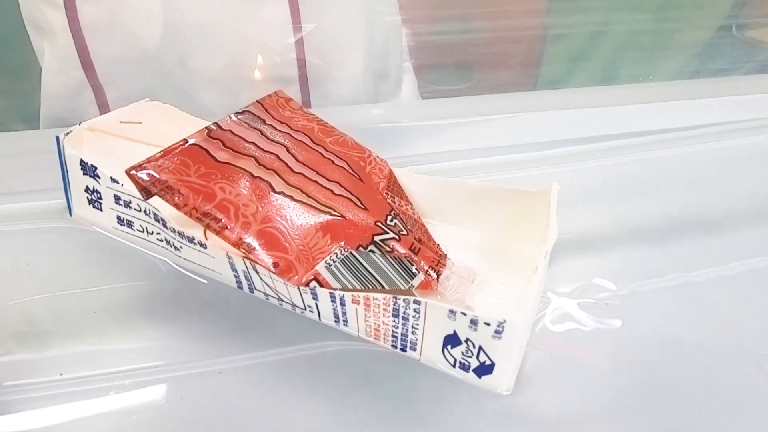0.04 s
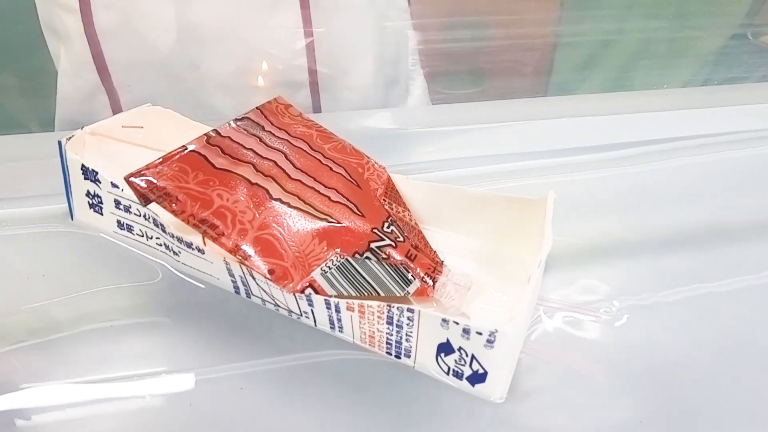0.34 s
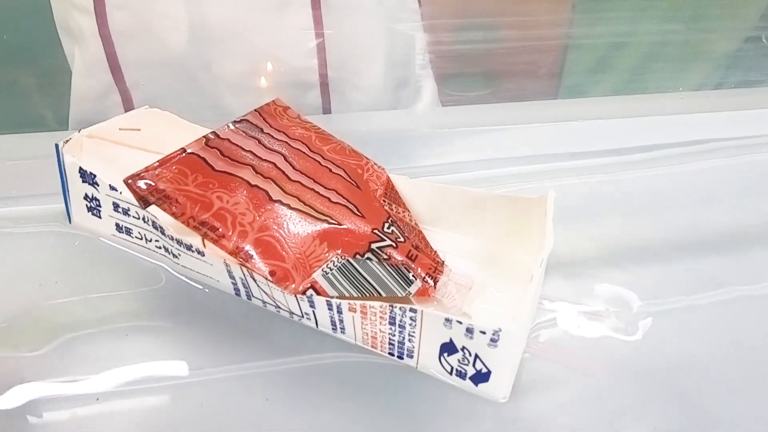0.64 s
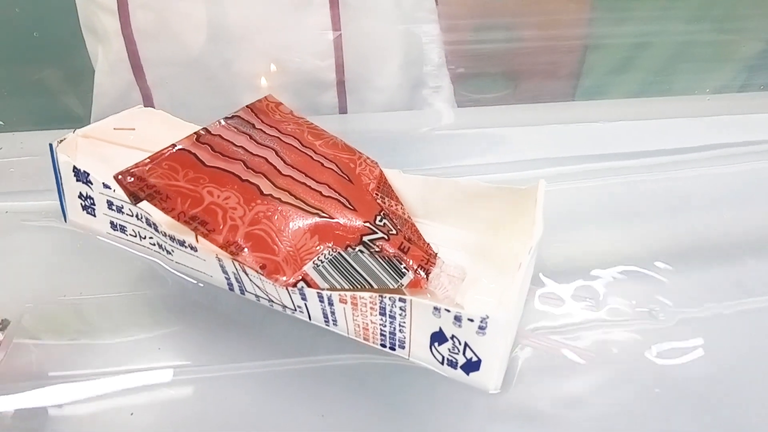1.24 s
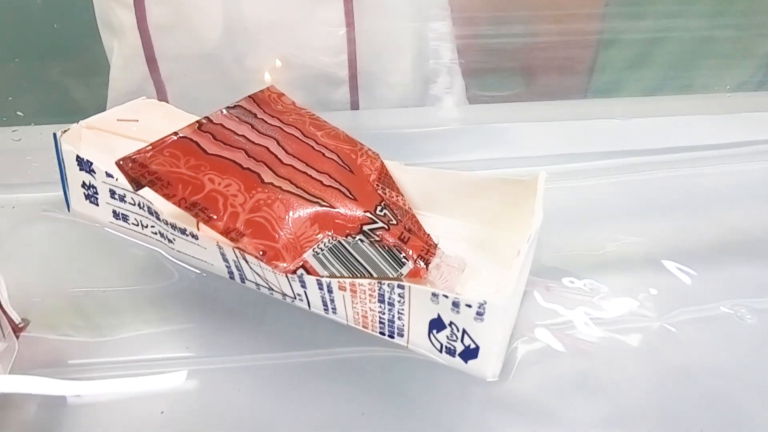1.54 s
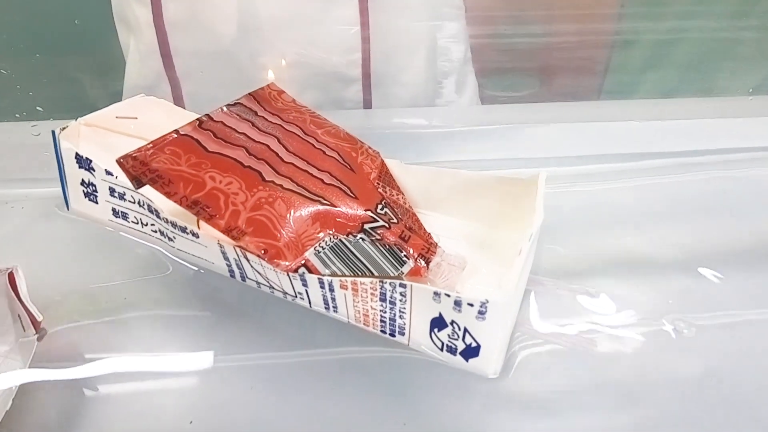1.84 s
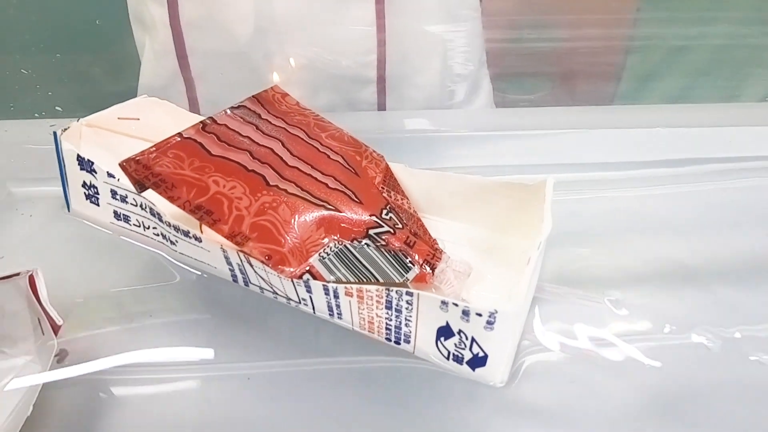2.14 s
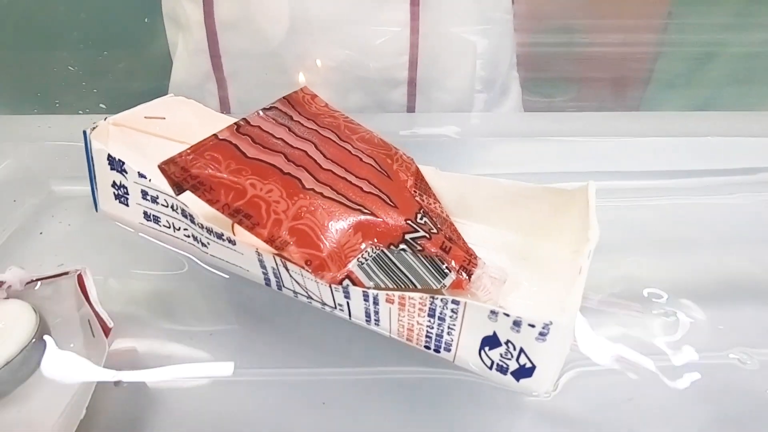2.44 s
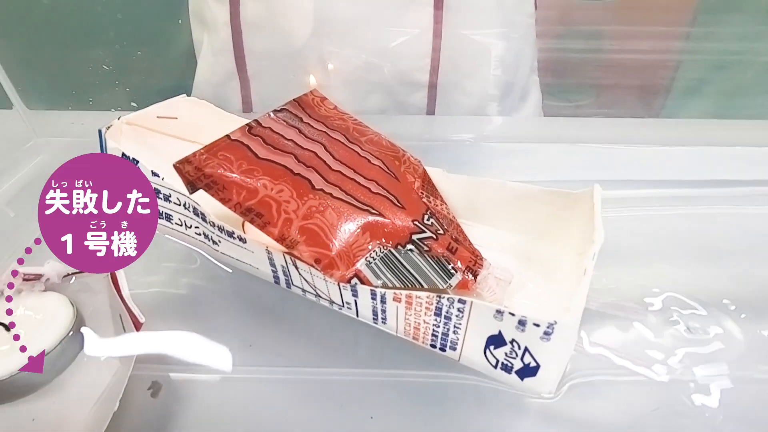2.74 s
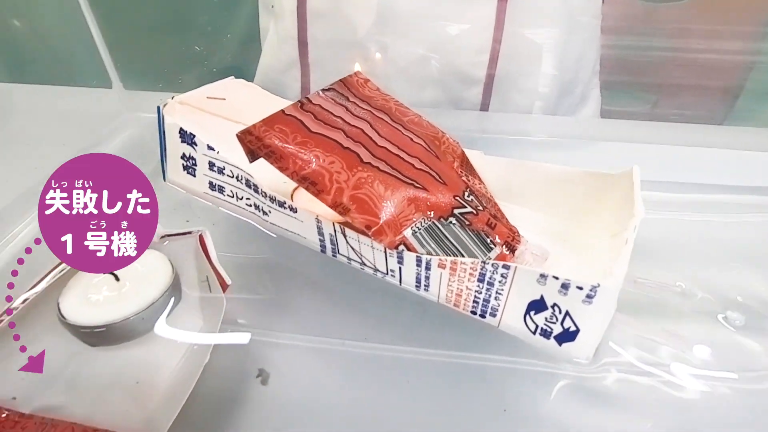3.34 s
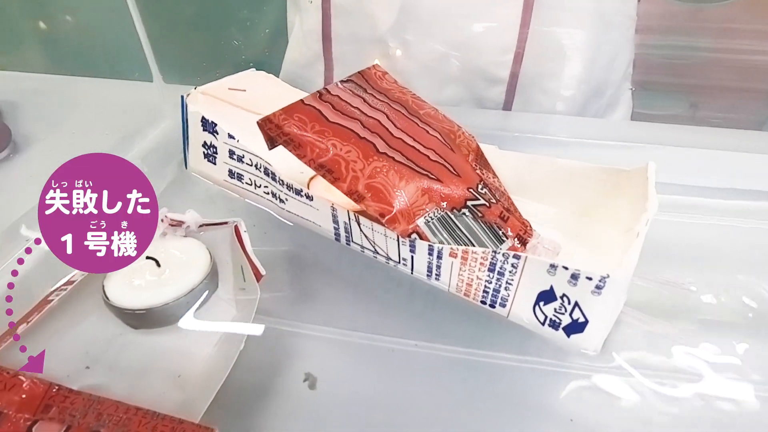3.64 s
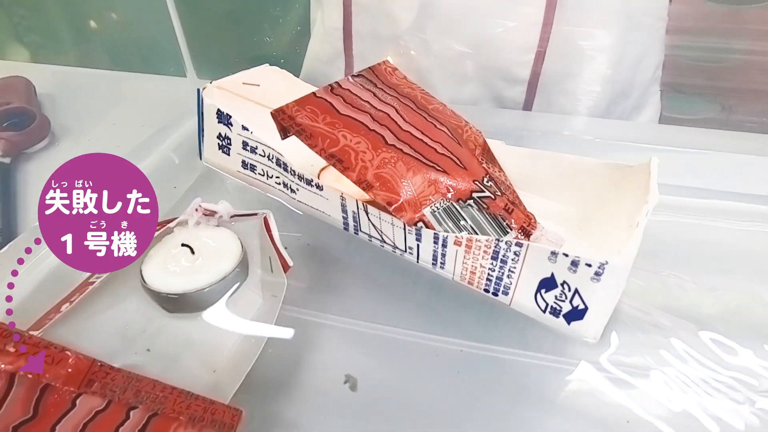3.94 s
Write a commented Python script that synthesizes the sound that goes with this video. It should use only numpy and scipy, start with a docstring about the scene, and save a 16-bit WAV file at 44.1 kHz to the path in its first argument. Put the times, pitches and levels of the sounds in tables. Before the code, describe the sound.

A toy steam boat putters in a tub of water, heard close up in a small room. For the whole four seconds it gives soft fizzing puffs, nearly four a second, most ending in bright spits and a tiny bubble plop. Soft low thumps come at about 0.9, 2.1 and 3.7 seconds. A low room rumble, a hum and a thin hiss lie underneath.

```python
"""Toy steam boat in a tub

A candle-driven toy boat putters in a plastic tub of water, heard close up in a small room.
Nearly four times a second its boiler drives out a soft puff of fizzing noise, ending in bright spits
and the damped ring of a bubble. The tub's modes ring faintly in response.
A few soft thumps, a low room rumble, a hum and a thin hiss lie underneath."""
import sys
import numpy as np
from scipy import signal
from scipy.fft import rfft, irfft
from scipy.io import wavfile
from scipy.ndimage import uniform_filter1d

SR = 44100
rng = np.random.default_rng(int(sys.argv[2]) if len(sys.argv) > 2 else 0)


def log_audio(samples):
    """Write samples as a 16-bit WAV file to the path given in sys.argv[1]."""
    # one column per channel
    frames = np.atleast_2d(samples).T
    # limit to full scale, then quantise
    limited = np.clip(frames, -1, 1)
    pcm = np.round(limited * 32767).astype(np.int16)
    wavfile.write(sys.argv[1], SR, pcm)


N = 4 * SR

# Strokes of the boiler. Each row: start in seconds, time until release in seconds, relative level in dB.
BOILER_STROKES = [(0.018, 0.1, -52.5), (0.278, .12, -52.5), (0.557, 0.1, -51.5), (0.811, 0.11, -50.5),
                  (1.082, 0.093, -51.5), (1.318, 0.11, -48.5), (1.629, 0.051, -49.5), (1.845, 0.11, -52),
                  (2.097, 0.1, -48), (2.359, 0.093, -48), (2.624, 0.093, -49.5), (2.885, .11, -49.5),
                  (3.141, 0.1, -50.5), (3.404, .11, -50.5), (3.668, 0.09, -49), (3.93, 0.12, -52)]
# Spectrum of the fizz. Each row: frequency in Hz, relative spectral level in dB.
FIZZ_SPECTRUM = [(500, 5.5), (1000, 1.5), (1600, 2), (2000, 1), (2600, 1), (3200, 3.5), (5000, 3),
                 (7000, 0), (8500, -11.5), (10500, -27), (15000, -44)]
# Hollow resonances of the fizz. Each row: frequency in Hz, bandwidth in Hz,
# then gain in dB at the start, middle and end of the scene.
HOLLOW_RESONANCES = [(1210, 250, -25, -13, -3), (1840, 400, 3, -7.5, -11), (2616, 220, -8, 5, 8),
                     (3590, 170, -4, -12, -15), (4890, 380, -15, -7, -1), (6800, 1000, -10, -8, -5)]

def boiler_puffs():
    """Source and filter: steam, tiny bubbles and crackles feed resonances that shift as the boat moves."""
    lead_s, attack_s, release_s = 0.024, 0.01, 0.026
    flow, age = np.zeros(N), np.arange(SR // 2) / SR - lead_s
    rise = np.interp(age, [-lead_s, 0, attack_s], [0, undb(-12.5), 1])  # a faint hiss leads each puff
    for start, length, db in BOILER_STROKES:
        level = undb(db - 0.5 * np.minimum(age / length, 1))
        release = np.exp(-np.maximum(age - length, 0) / release_s)
        add(flow, start - lead_s, level * rise * release)
    grains = np.sign(noise()) * ticks(per_second=1000, spread_db=1.5)
    crackle_decay_s = 0.0007
    pole = np.exp(-1 / (crackle_decay_s * SR))
    crackle = noise() * signal.lfilter([1], [1, -pole], ticks(per_second=110, spread_db=3))
    bubbly_steam = unit(unit(grains) + undb(2) * noise())
    fizz = colour(bubbly_steam + undb(-3.5) * unit(crackle), FIZZ_SPECTRUM)
    progress = np.linspace(0, 1, N)
    hollow = sum(undb(np.interp(progress, [0, 0.5, 1], gains_db)) * resonate(fizz, hz, width)
                 for hz, width, *gains_db in HOLLOW_RESONANCES)
    flutter = undb(1.5 * wander(rate_hz=90))
    return undb(2) * flow * unit((fizz + hollow) * flutter)


# Spits of water. Each row: start in seconds, relative level in dB, resonant frequency in Hz,
# level of the bright tip in dB relative to the spray.
WATER_SPITS = [(.040, -47, 4800, -19), (.098, -57, 4900, -17), (0.122, -41, 5700, -15),
               (0.134, -41.5, 5650, -22), (.276, -55, 5200, -15), (.291, -45.5, 4670, -21),
               (.338, -39.5, 4430, -26), (.348, -56, 4800, -15), (0.366, -41.5, 7040, -7),
               (0.3863, -37.5, 5100, -15), (.398, -42.5, 5760, -18), (0.552, -52.5, 5200, -8),
               (.568, -60, 5200, -15), (.610, -46, 5100, -17), (0.637, -42, 6600, -11),
               (0.6623, -42.5, 5400, -19), (.806, -56, 5000, -15), (.824, -48, 4900, -18),
               (.868, -39, 5170, -19), (0.896, -44, 8100, -3), (0.923, -44.5, 7300, -9),
               (1.068, -51, 6800, -10), (1.089, -54, 4900, -13), (1.108, -48, 6030, -15),
               (1.1611, -44, 5300, -18), (1.187, -47, 4200, -18), (1.325, -43.5, 4900, -15),
               (1.352, -45, 4900, -15), (1.384, -44, 5500, -14), (1.414, -41, 6800, -8),
               (1.43, -45, 6850, -11), (1.605, -49.5, 5130, -7), (1.671, -36.5, 6130, -22),
               (1.682, -34, 6540, -22), (1.852, -47.5, 4970, -12), (1.908, -47, 5600, -15),
               (1.927, -38, 5560, -18), (1.937, -42.5, 6300, -11), (2.045, -52.5, 5400, -18),
               (2.112, -44, 5000, -20), (2.124, -41, 5040, -24), (2.1923, -43, 5230, -24),
               (2.2, -39.5, 5100, -29), (2.4448, -49, 6000, -18), (2.459, -40.5, 5560, -13),
               (2.712, -33.5, 5670, -23), (2.718, -38, 6560, -15), (2.895, -47, 5100, -20),
               (2.973, -37, 6260, -14), (2.988, -32.5, 5550, -27), (3.179, -45, 5300, -16),
               (3.196, -39.5, 4900, -14), (3.24, -47.5, 5500, 1.5), (3.499, -35.5, 5430, -21),
               (3.5, -43, 6850, -12), (3.683, -46, 5200, -21), (3.7543, -43, 4630, -13),
               (3.768, -39, 5400, -12)]
# Spectra of the spray and of its bright tip. Each row: frequency in Hz, relative spectral level in dB.
SPRAY_SPECTRUM = [(700, -2), (1500, 6), (2500, 6.5), (3600, 4), (5400, 6.5), (7200, 3.5), (8600, -17),
                  (10500, -36), (15000, -56)]
TIP_SPECTRUM = [(4000, -33), (7000, 3.5), (8200, 1), (9500, -16), (11000, -17.5), (15000, -57)]

def water_spits():
    """Resonant filtering gives each brief noise burst of spray a pitch of its own."""
    out, age = np.zeros(N), np.arange(SR // 10) / SR
    hiss, mist = colour(noise(), SPRAY_SPECTRUM), colour(noise(), TIP_SPECTRUM)
    envelope = burst(age, attack_s=0.00098, decay_s=0.0054)
    for start, db, hz, tip_db in WATER_SPITS:
        spray, tip = (x[int(start * SR):][:len(age)] for x in (hiss, mist))
        pitched = unit(spray + undb(14.5) * resonate(spray, hz, width_hz=680))
        add(out, start, undb(db + 2) * envelope * (pitched + undb(tip_db) * tip))
    return out


# Bursting bubbles. Each row: start in seconds, relative level in dB, initial frequency in Hz,
# decay time constant in seconds, level offset of the splash in dB.
BUBBLES = [(0.109, -42.5, 1650, 0.0018, 3), (0.3668, -35.5, 2150, 0.0022, -1),
           (0.375, -40, 1780, 0.0025, -3), (0.628, -40, 2120, 0.0028, 0), (0.6403, -31.5, 1820, 0.0023, -3),
           (0.897, -37, 1650, 0.0018, -2.5), (1.167, -30.5, 1920, 0.0015, -3.5),
           (1.388, -41.5, 1870, 0.0023, -0.5), (1.4147, -43.5, 2090, 0.0017, 3.5),
           (1.608, -49, 1850, 0.0017, 2), (1.6781, -36.5, 1820, 0.0022, 0.5),
           (1.683, -38.5, 1880, 0.0023, -15), (1.9372, -32.5, 1630, 0.0014, -1.5),
           (1.953, -25.5, 1700, 0.0015, -12), (2.0444, -36.5, 1520, 0.0026, -10),
           (2.190, -41, 1730, 0.0018, 2), (2.459, -29.5, 1890, 0.0017, -1.5), (2.465, -47, 1610, .002, -8),
           (2.5733, -48.5, 1600, 0.0018, 2), (2.718, -41, 1610, 0.0022, 5), (2.834, -51.5, 1495, .003, -10),
           (2.9757, -35.5, 1610, 0.0018, -3), (3.2385, -33.5, 2170, 0.0021, 0),
           (3.2425, -34.5, 2285, 0.0033, -6), (3.497, -42.5, 1590, 0.0018, 1.5),
           (3.7618, -38, 1980, 0.0023, -15)]
# Spectrum of the splash round a bubble. Each row: frequency in Hz, relative spectral level in dB.
SPLASH_SPECTRUM = [(700, -11), (1200, -4.5), (1600, 8), (2300, 4), (3000, -7), (5000, -11), (12000, -48)]

def bubble_plops():
    """A bubble is a damped oscillator: it rings for a few cycles, rising in pitch, in a noisy splash."""
    attack_s, rise_per_s = 0.0014, 5.1  # the rise is a fraction of the initial frequency
    ring, splash, age = np.zeros(N), np.zeros(N), np.arange(SR // 20) / SR
    for start, db, hz, decay_s, splash_db in BUBBLES:
        phase = 2 * np.pi * hz * (age + rise_per_s * age ** 2 / 2)
        add(ring, start, undb(db + 7) * burst(age, attack_s, decay_s) * np.sin(phase))
        add(splash, start, undb(db + splash_db) * burst(age, attack_s, decay_s=0.0056))
    return ring + splash * colour(noise(), SPLASH_SPECTRUM)


# Modes of the tub. Each row: frequency in Hz, time to decay by 60 dB in seconds, relative gain in dB.
TUB_MODES = [(1595, 0.038, 0.5), (1777, 0.13, -6), (1963, 0.082, -2.5), (2248, 0.11, -0.5),
             (2477, 0.13, -5), (2700, .12, -24), (4640, 0.065, -15), (5600, 0.1, -24)]

def tub(x):
    """Forced vibration: sound drives the tub's modes, whose bandwidths vary inversely with decay time."""
    ring = sum(undb(db) * resonate(x, hz, np.log(1000) / np.pi / t60) for hz, t60, db in TUB_MODES)
    return x + undb(1.5) * ring


def room(x):
    """Reverberation: the diffuse reflections of a small room act as convolution with decaying noise."""
    t60_s, delay_s = 0.13, 0.0047
    age = np.arange(SR // 2) / SR - delay_s
    tail = rng.standard_normal(len(age)) * (age > 0) * np.exp(-np.log(1000) * age / t60_s)
    return x + undb(-11) * signal.fftconvolve(x, tail / np.linalg.norm(tail))[:N]


# Soft low thumps. Each row: start in seconds, relative level in dB, frequency in Hz.
LOW_THUMPS = [(.862, -16, 152), (2.048, -17.5, 105), (2.0642, -15, 81.4), (3.683, -15, 159)]

def thumps():
    """Heavy damping ends a low oscillation within a few cycles, so it is heard as a soft knock."""
    out, age = np.zeros(N), np.arange(SR // 2) / SR
    envelope = 2 * burst(age, attack_s=0.0059, decay_s=0.0049)
    for start, db, hz in LOW_THUMPS:
        add(out, start, undb(db) * envelope * np.sin(2 * np.pi * hz * age))
    return out


# Spectra of the rumble and the steady room noise. Each row: frequency in Hz, relative spectral level in dB.
RUMBLE_SPECTRUM = [(12, -13), (25, 2), (50, 3), (75, 5), (120, -0.5), (200, -11.5), (300, -10), (600, -50),
                   (5000, -93)]
ROOM_SPECTRUM = [(100, -29.5), (150, 0), (200, -2), (260, -6), (380, -13), (560, -28.5), (800, -18.5),
                 (1000, -29.5), (2000, -33), (3300, -35.5), (6500, -37), (9000, -45.5), (13000, -55.5),
                 (15500, -67)]
# Resonances of the hum. Each row: frequency in Hz, nominal bandwidth in Hz, relative level in dB.
HUM_BANDS = [(100.9, 5.9, -12.5), (144.66, 5.6, -6.5), (172.9, 23.6, -3.5), (210.2, 35, -10.5)]
# Envelopes of the rumble, the hum and a dull murmur. Each row: time in seconds, relative level in dB.
RUMBLE_ENVELOPE = [(0, -46.5), (.1, -41.5), (.27, -46.5), (.4, -40), (.63, -36), (.7, -53), (.88, -30.5),
                   (1.04, -49), (1.4, -45.5), (1.7, -36.5), (2.01, -36.5), (2.08, -29.5), (2.3, -52),
                   (2.72, -33.5), (3.03, -44.5), (3.25, -34), (3.6, -40), (4, -43)]
HUM_ENVELOPE = [(0, -37.5), (.35, -37.5), (.46, -32), (.56, -35), (.79, -33.5), (.87, -32), (1.01, -45.5),
                (1.18, -31.5), (1.34, -37), (1.61, -29.5), (1.69, -41.5), (1.85, -30.5), (1.98, -42),
                (2.05, -26), (2.12, -41), (2.31, -52.5), (2.51, -32.5), (2.95, -36.5), (3.33, -29.5),
                (3.58, -36.5), (3.69, -32), (4, -36.5)]
MURMUR_ENVELOPE = [(0, -55), (.9, -49), (1.03, -56), (1.3, -56), (1.98, -52.5), (2.1, -46.5), (2.35, -53.5),
                   (3.15, -49.5), (3.45, -48.5), (3.75, -45.5), (4, -49)]

def background():
    """Slow amplitude modulation makes low bands of noise swell and fade over the steady room noise."""
    rumble = follow(RUMBLE_ENVELOPE) * colour(noise(), RUMBLE_SPECTRUM)
    hum = follow(HUM_ENVELOPE) * sum(undb(db) * band(hz, width) for hz, width, db in HUM_BANDS)
    murmur = follow(MURMUR_ENVELOPE) * band(hz=319, width_hz=103)
    steady = undb(-41.5) * colour(noise(), ROOM_SPECTRUM)
    return rumble + hum + murmur + steady


def undb(db):
    """Amplitude ratio of a level in decibels."""
    return 10 ** (np.asarray(db) / 20)


def unit(x):
    """Normalisation to rms 1."""
    return x / np.sqrt(np.mean(x ** 2))


def noise():
    """Gaussian white noise."""
    return rng.standard_normal(N)


def colour(x, spectrum):
    """Spectral shaping by (Hz, dB) points on a logarithmic frequency axis; rms 1."""
    hz, db = np.array(spectrum).T
    bin_hz = np.maximum(np.arange(N // 2 + 1) * SR / N, 1)
    gain = undb(np.interp(np.log(bin_hz), np.log(hz), db))
    return unit(irfft(rfft(x) * gain, N))


def resonate(x, hz, width_hz):
    """Second-order resonance with gain 1 at its centre."""
    return signal.lfilter(*signal.iirpeak(hz, hz / width_hz, fs=SR), x)


def band(hz, width_hz):
    """Narrow-band noise: two resonators in cascade steepen the skirts; rms 1."""
    return unit(resonate(resonate(noise(), hz, 2 * width_hz), hz, 2 * width_hz))


def burst(age, attack_s, decay_s):
    """Transient envelope with exponential rise and decay."""
    return (1 - np.exp(-age / attack_s)) * np.exp(-age / decay_s)


def follow(envelope):
    """Gain interpolated between (seconds, dB) points."""
    return undb(np.interp(np.arange(N) / SR, *np.array(envelope).T))


def wander(rate_hz):
    """Low-pass smoothing turns noise into a random drift; rms 1."""
    size = int(SR / rate_hz)
    return unit(uniform_filter1d(uniform_filter1d(noise(), size), size))


def ticks(per_second, spread_db):
    """Poisson process: impulses at random times, a few larger than the rest."""
    hits = rng.random(N) < per_second / SR
    return hits * undb(spread_db * np.minimum(rng.exponential(size=N), 4))


def add(out, start, sound):
    """Superposition of a short sound at its start time in seconds."""
    first = max(int(start * SR), 0)
    part = out[first:first + len(sound)]
    part += sound[:len(part)]


def scene():
    """The boat's sound passes through tub and room in series, then adds to the background; mono."""
    boat = boiler_puffs() + water_spits() + bubble_plops()
    return (room(tub(boat)) + thumps() + background())[None]


def record(dry):
    """A steep elliptic low-pass filter removes the highest treble."""
    cutoff_hz = 15300
    return signal.sosfilt(signal.ellip(8, 0.2, 70, cutoff_hz, fs=SR, output="sos"), dry)


dry = scene()
out = record(dry)
log_audio(out)
```